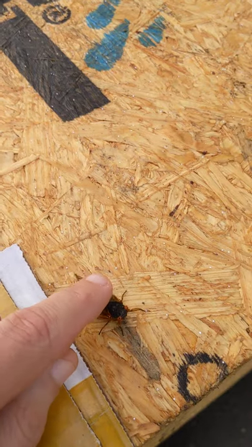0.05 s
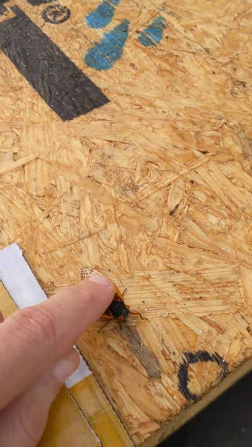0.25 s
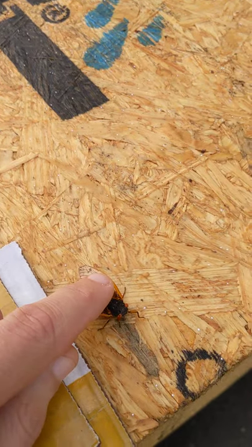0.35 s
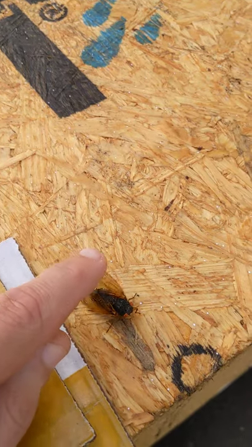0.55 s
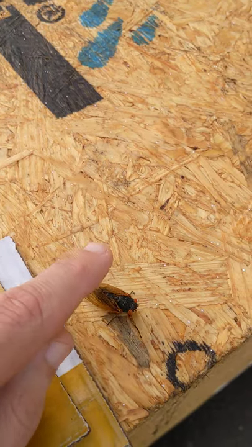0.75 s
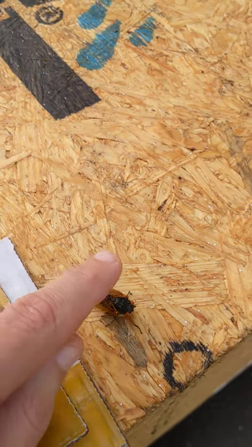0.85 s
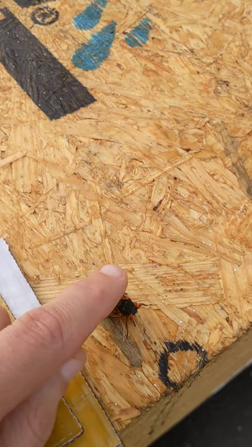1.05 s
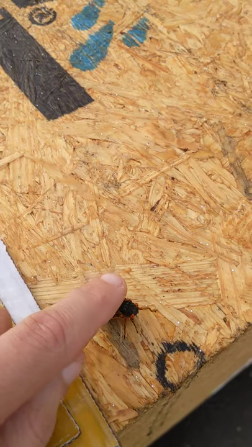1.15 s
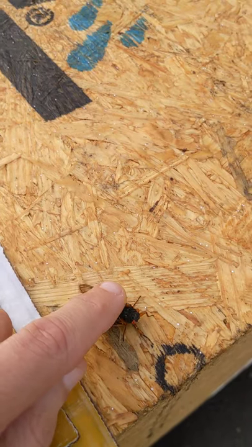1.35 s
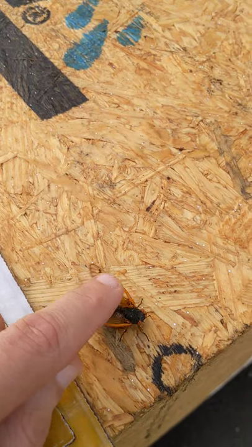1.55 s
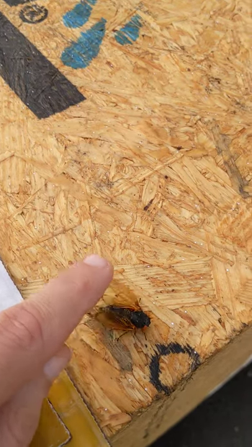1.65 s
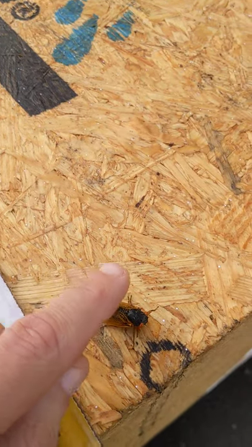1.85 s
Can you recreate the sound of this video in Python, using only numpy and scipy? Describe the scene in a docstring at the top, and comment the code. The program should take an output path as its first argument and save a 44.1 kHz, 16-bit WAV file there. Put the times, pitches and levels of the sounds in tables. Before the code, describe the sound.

A cicada, touched on a wooden board, gives two loud, harsh, high buzzes close to the microphone. The second breaks into stutters, and a few faint ticks follow, over a low rumble, hiss and distant machine hum.

```python
"""Alarm buzzes of a cicada

A cicada on a wooden board, touched by a finger, gives two harsh buzzes; the second breaks into stutters.
Its two tymbals pull in turn: in each stroke a row of ribs buckles, click by click, and pumps a ring that
falls in pitch. A few faint ticks follow as it moves. A distant machine hums under a low rumble and hiss.
"""
import sys
import numpy as np
from scipy import signal
from scipy.fft import rfft, irfft, next_fast_len
from scipy.io import wavfile
from scipy.ndimage import map_coordinates

SR = 44100
rng = np.random.default_rng(int(sys.argv[2]) if len(sys.argv) > 2 else 0)


def inscribe(sig):
    """Save sig as 16-bit PCM at rate SR to the path in sys.argv[1].

    A 1-D sig is mono; a 2-D sig holds one channel per row.
    Samples are clipped to [-1, 1] before scaling.
    """
    pcm = np.round(np.clip(np.atleast_2d(sig).T, -1, 1) * 32767)
    wavfile.write(sys.argv[1], SR, pcm.astype(np.int16))


N = 83790
FULL_STROKE_S = .0108


def amp(db):
    """Amplitude ratio of a level in decibels."""
    return 10 ** (np.asarray(db) / 20)


def along(points, hz):
    """Interpolation of (Hz, value) points on a logarithmic frequency axis."""
    f, v = np.transpose(points)
    return np.interp(np.log(hz + 1), np.log(f + 1), v)


def over_time(points):
    """Linear interpolation of (seconds, value) points at every sample."""
    return np.interp(np.arange(N) / SR, *np.transpose(points))


def wobble(rate):
    """Slow random modulation: a spline through `rate` knots a second."""
    return map_coordinates(rng.standard_normal(int(N * rate / SR) + 4), [np.arange(N) * rate / SR])


def filtered(x, response):
    """Linear filtering: the spectrum is multiplied by a frequency response."""
    m = 2 * next_fast_len(N)
    return irfft(rfft(x, m) * response(np.fft.rfftfreq(m, 1 / SR)), m)[..., :N]


def minimum_phase(db):
    """Causality: a response with this gain that rings only after its excitation."""
    cepstrum = irfft(np.log(amp(db)))
    half = len(cepstrum) // 2
    cepstrum[1:half] *= 2
    cepstrum[half + 1:] = 0
    return np.exp(rfft(cepstrum))


def add(track, start_s, x):
    """Superposition of x on the track."""
    i = int(round(start_s * SR))
    track[i:i + len(x)] += x[:N - i]


def rumble_and_hiss(rumble_hz=61.4):
    """Partly coherent noise: the balance of mid and side sets the correlation between the ears."""
    # Each row: frequency in Hz, relative spectral density in dB.
    spectrum = [(15, -53), (25, -7), (50, -7.5), (75, -5), (91, -12), (115, -4), (160, -4.5), (215, -12.5),
                (280, -16.5), (420, -15.5), (600, -16.5), (1400, -18.5), (1570, -25.5), (1900, -25),
                (2850, -30), (5280, -32), (7100, -40.5), (11000, -43.5), (15500, -51.5)]
    # Each row: frequency in Hz, left-right correlation.
    correlation = [(60, 0.89), (130, 0.98), (290, 0.77), (640, 0.61), (1410, -0.092), (3100, -0.42),
                   (6820, 0.1), (15000, -0.11)]
    # Each row: time in seconds, relative level of the noise in dB.
    levels = [(0.0, -47), (0.078, -44), (0.28, -48), (0.75, -49.5), (0.898, -46), (1.184, -45.5),
              (1.72, -49.5), (1.9, -44.5)]
    # Each row: time in seconds, gain of the deepest rumble in dB.
    swell = [(0, 5.5), (.35, 6), (.8, -0.5), (1.3, 4.5), (1.5, -2), (1.9, -12)]

    angle = lambda hz: np.arccos(np.clip(along(correlation, hz), -1, 1)) / 2
    response = lambda hz: amp(along(spectrum, hz)) * [np.cos(angle(hz)), np.sin(angle(hz))]
    mid, side = filtered(rng.standard_normal((2, N)), response)
    air = np.array([mid + side, mid - side])
    level_db = over_time(levels) + 5.5 + .82 * wobble(11.82)
    air *= amp(level_db) / np.sqrt(np.mean(air ** 2))
    rumble = filtered(air, lambda hz: 1 / (1 + (hz / rumble_hz) ** 4))
    return air + (amp(over_time(swell)) - 1) * rumble


def machine_hum(hum_hz=106):
    """Harmonics and one lower partial of a distant machine, modulated slightly in pitch and level."""
    # Each row: multiple of the hum frequency, rms level in dB.
    partials = [(.405, -52.5), (1, -49), (3, -58.5), (4, -58.5), (5, -65), (6, -65.5)]
    phase = 2 * np.pi * np.cumsum(hum_hz * (1 + .003 * wobble(6))) / SR
    return sum(np.sqrt(2) * amp(db + 1.8 * wobble(6.85)) * np.sin(k * phase + rng.uniform(0, 2 * np.pi))
               for k, db in partials)


def reflections(x, t60):
    """Diffuse reverberation: convolution with decaying noise, independent at each ear."""
    t = np.arange(SR // 4) / SR
    tail = rng.standard_normal((2, len(t))) * amp(-60 * t / t60) * (1 - np.exp(-t / .003))
    tail /= np.linalg.norm(tail, axis=1, keepdims=True)
    return signal.fftconvolve(x, tail, axes=1)[:, :N]


def ticks(t60=.0082, centre_hz=9500):
    """Light impacts of legs and wings on the board: heavily damped bursts of band-limited noise."""
    # Each row: start in seconds, level before filtering in dB.
    taps = [(0.7649, -46.5), (1.668, -38), (1.718, -42), (1.731, -49), (1.755, -46)]
    t, track = np.arange(SR // 20) / SR, np.zeros(N)
    for start, db in taps:
        add(track, start, amp(db - 60 * t / t60) * rng.standard_normal(len(t)))
    return filtered(track, lambda hz: np.exp(-2 * np.log((hz + 1) / centre_hz) ** 2))


def tymbal_stroke(length_s, ring_db, ribs=14):
    """Ribs buckle in phase with the resonance they drive. Returns clicks, crackle envelope and ring."""
    ring_hz, sag_hz, drop_hz, overtone_ratio = 4450, 720, 400, 2.4
    attack_s, decay_s, crackle_s = .00025, .001, .0003
    gap_s, gap_growth, gap_scatter = .00088, .085, .11
    first_rib_db, last_rib_db, scatter_db, rebound_db, slack_db = -3.5, -4.5, 1.3, -15, -5

    t = np.arange(SR // 40) / SR
    lateness, strength, drift = rng.standard_normal((ribs, 3)).T
    progress = np.minimum(t / FULL_STROKE_S, 1.1)
    wander = .034 * (drift[0] + np.interp(t, np.linspace(0, t[-1], ribs), drift[::-1]))
    pitch = (ring_hz - sag_hz * progress - drop_hz * progress ** 8) * (1 + wander)
    cycles = np.cumsum(pitch) / SR
    snap = lambda at: np.sinc((t - at) * SR) * np.exp(-((t - at) * SR / 10) ** 2)
    fade = lambda at, life: (t >= at) * np.exp(-np.abs(t - at) / life)

    rebound_s = .0142 * (1 + .03 * drift[1])  # the tymbal pops back
    clicks = amp(rebound_db) * snap(rebound_s)
    crackle = amp(rebound_db) * 2 * fade(rebound_s, crackle_s)
    swell, due = np.zeros(len(t)), 1 / ring_hz
    for k in range(ribs):
        if due > length_s:
            break
        at = np.interp(np.round(np.interp(due, t, cycles)), cycles, t)  # nearest whole cycle of the ring
        gain = amp(first_rib_db * (k == 0) + last_rib_db * (at / length_s) ** 4 + scatter_db * strength[k])
        clicks += gain * snap(at)
        crackle += gain * fade(at, crackle_s)
        swell += gain * (fade(at, decay_s) - fade(at, attack_s))
        due += (gap_s + gap_growth * min(due, FULL_STROKE_S / 2)) * (1 + gap_scatter * lateness[k])

    overtone_gain = amp(-8 + .28 * ring_db) * (1 - progress ** 2)  # a louder ring is brighter
    overtone = overtone_gain * np.sin(2 * np.pi * overtone_ratio * cycles)
    swell *= amp(slack_db * progress ** 10)
    return clicks, crackle, swell * (overtone - np.sin(2 * np.pi * cycles))


def buzz(pace, imbalance_offset):
    """Two tymbals work in antiphase. Returns each stroke's start, length, level and ring gain."""
    # Each row: time in seconds, relative level in dB, tymbal imbalance in dB, ring gain in dB.
    effort = [(.211, -4, -4.5, -1), (.30, -1, -3, -6), (.41, -1, 0.5, -6.5), (.51, .5, -1, -2),
              (.57, -0.7, -1.5, 1), (.66, -3, 1, 0), (1.334, -3, 0, -4.5), (1.45, 0.8, -1.5, -6.5),
              (1.53, 2.4, -1.5, -4)]
    times, rate, share = np.transpose(pace)
    t = np.arange(times[0], times[-1], 1 / SR)
    turns = 2 * np.cumsum(np.interp(t, times, rate)) / SR
    k = np.arange(int(turns[-1]) + 1)
    starts = np.interp(k, turns, t)
    lengths = np.interp(starts, times, share / rate)
    when, *columns = np.transpose(effort)
    db, imbalance_db, ring_db = [np.interp(starts, when, column) for column in columns]
    db += (k + imbalance_offset) % 2 * imbalance_db
    return list(zip(starts, lengths, db, ring_db))


def cicada(sizzle_hz=10200, sizzle_width_hz=850, stutter_ring_db=-1.5):
    """Source and filter: rib clicks excite the body and a high rib mode, over the ring and crackle."""
    # Each row: time in seconds, strokes per second of each tymbal, share of the cycle spent buckling.
    first_buzz = [(.211, 50.2, .37), (.30, 51.8, .5), (.41, 49.8, .51), (.51, 47, .51), (.57, 45, .5),
                  (.662, 43, .49)]
    second_buzz = [(1.3335, 54.5, .38), (1.39, 50.7, .5), (1.45, 48.7, .51), (1.53, 46, .51)]
    # Single strokes as the buzz breaks up. Each row: start in seconds, relative level in dB.
    stutters = [(1.550, 0.9), (1.5603, -1.5), (1.5887, -0.5), (1.5997, 0), (1.6291, 0)]
    # Colour of the clicks and of the crackle. Each row: frequency in Hz, gain in dB.
    body_colour = [(1000, -38), (2200, -23), (2900, -33.5), (3400, -11), (4000, -1), (4700, 2.5), (5600, 2),
                   (6300, -5), (7300, -20), (8200, -11), (10000, -12), (11800, -38), (15500, -40)]
    crackle_colour = [(2000, -50), (4000, -5), (7000, -3), (10000, -6), (12000, -6.5), (15500, -14)]
    # Each row: time in seconds, gain of the ribs' high mode in dB.
    sizzle_db = [(.21, -36), (.52, -20), (.57, -4), (.63, -7.5), (.67, -20), (1.33, -39), (1.6, -17),
                 (1.63, -0.5)]
    # The highest treble leans to the right. Each row: frequency in Hz, left minus right in dB.
    lean = [(2000, -2), (3300, 6), (4500, 2), (5600, 2.5), (6500, -1), (8200, 0), (10000, -5), (11500, -5),
            (15000, -14.5)]

    strokes = buzz(first_buzz, imbalance_offset=0) + buzz(second_buzz, imbalance_offset=.99)
    strokes += [(start, FULL_STROKE_S, db, stutter_ring_db) for start, db in stutters]
    clicks, crackles, rings = np.zeros((3, N))
    for start, length_s, db, ring_db in strokes:
        click, crackle, ring = tymbal_stroke(length_s, ring_db)
        add(clicks, start, amp(db + 1.5) * click)
        add(crackles, start, amp(db - 20.5) * crackle)
        add(rings, start, amp(db + ring_db - 22) * ring)

    body = filtered(clicks, lambda hz: minimum_phase(along(body_colour, hz)))
    mode = lambda hz: 1j * hz * sizzle_width_hz / (sizzle_hz ** 2 - hz ** 2 + 1j * hz * sizzle_width_hz)
    sizzle = amp(over_time(sizzle_db)) * filtered(clicks, lambda hz: mode(hz) ** 2)
    noise = crackles * rng.standard_normal((2, N))
    rasp = filtered(noise, lambda hz: minimum_phase(along(crackle_colour, hz)))
    ears = lambda hz: np.array([minimum_phase(side * along(lean, hz) / 2) for side in (1, -1)])
    return filtered(rings + body + sizzle + rasp, ears)


def scene():
    """Direct sound, early reflections from board and hand, and faint room reverberation add up."""
    insect = cicada() + ticks()
    early = amp(-11.5) * reflections(insect, t60=.03)
    room = amp(-28) * reflections(insect, t60=.44)
    return insect + early + room + rumble_and_hiss() + machine_hum()


def record(dry, cutoff_hz=15750):
    """Band limiting by an ideal low-pass filter."""
    return filtered(dry, lambda hz: hz < cutoff_hz)


dry = scene()
out = record(dry)
inscribe(out)
```